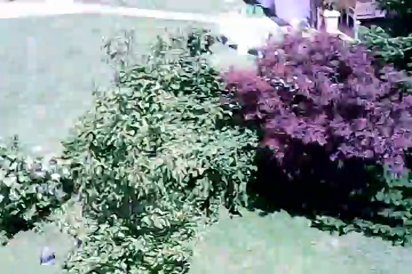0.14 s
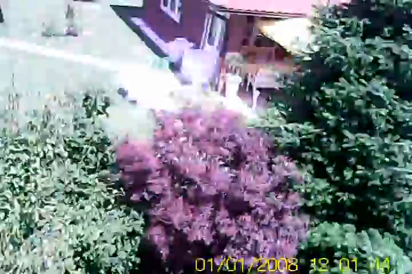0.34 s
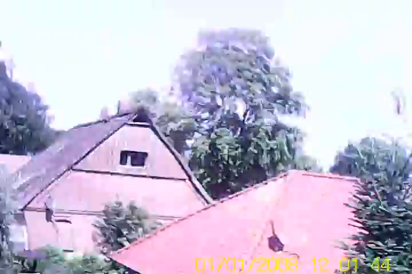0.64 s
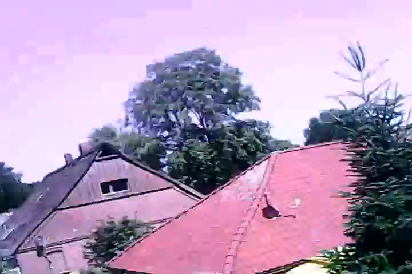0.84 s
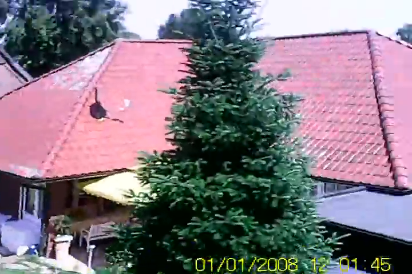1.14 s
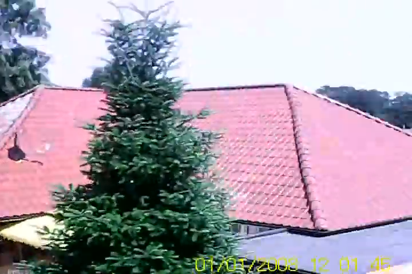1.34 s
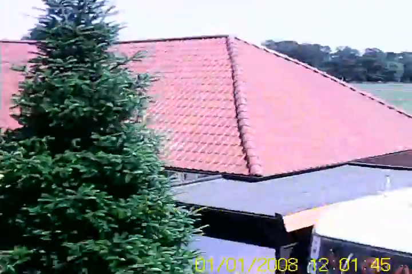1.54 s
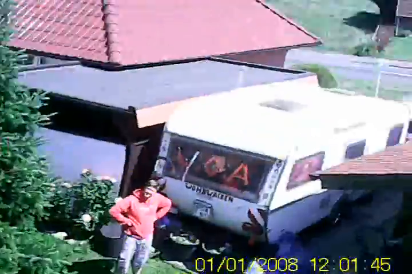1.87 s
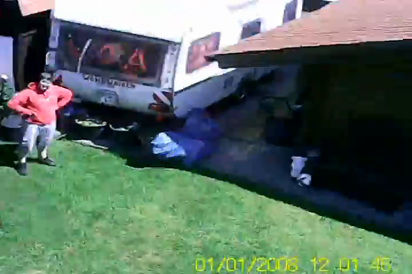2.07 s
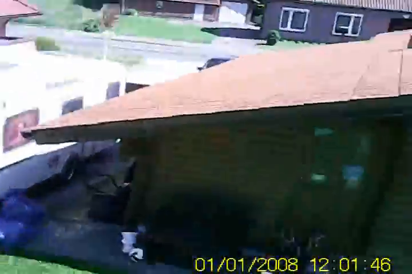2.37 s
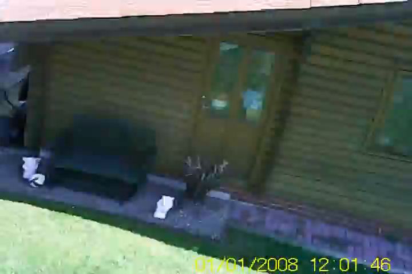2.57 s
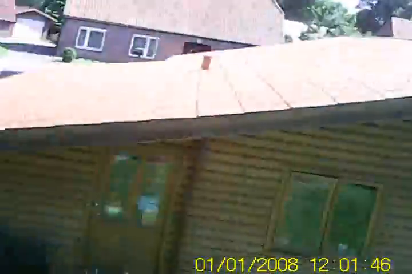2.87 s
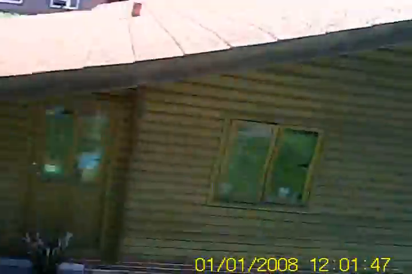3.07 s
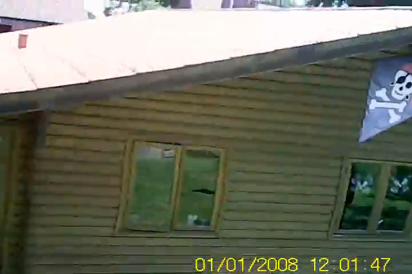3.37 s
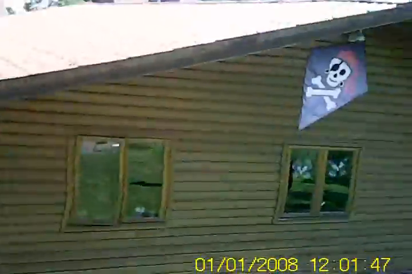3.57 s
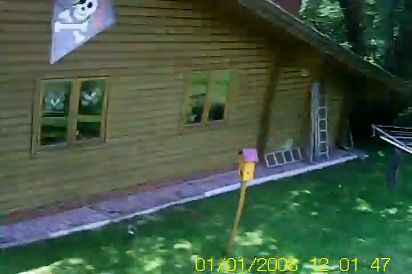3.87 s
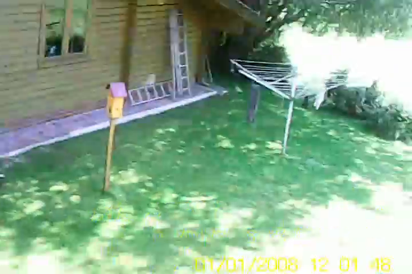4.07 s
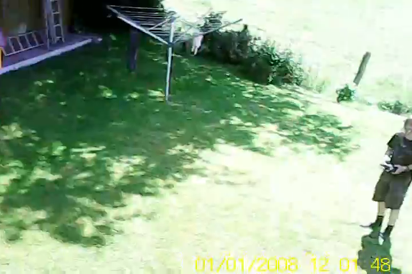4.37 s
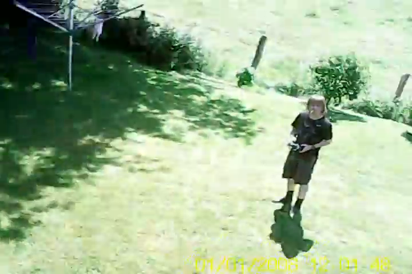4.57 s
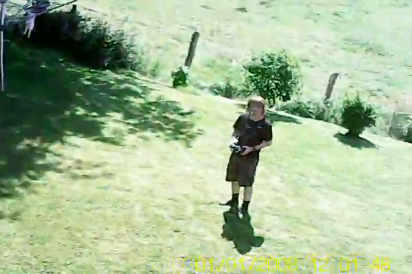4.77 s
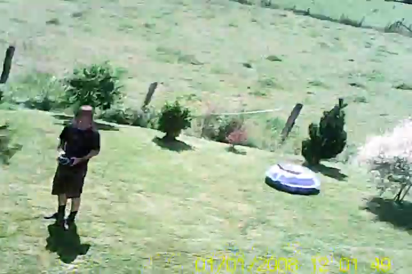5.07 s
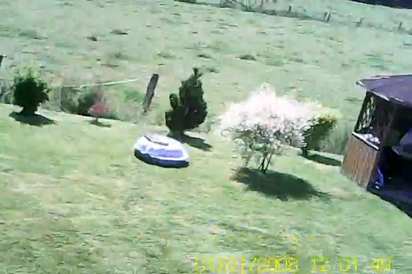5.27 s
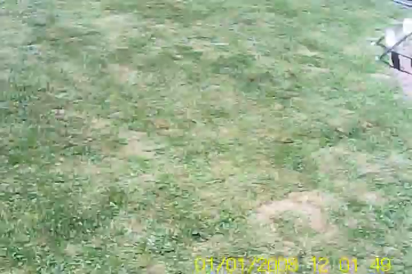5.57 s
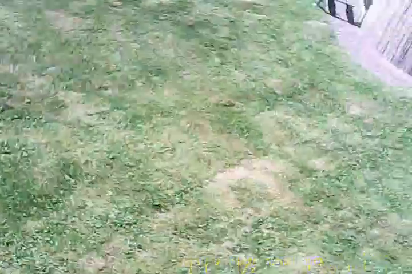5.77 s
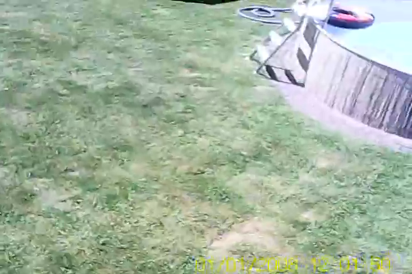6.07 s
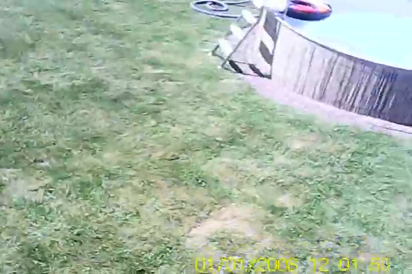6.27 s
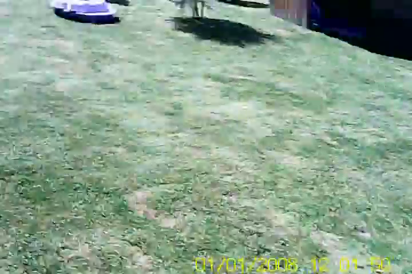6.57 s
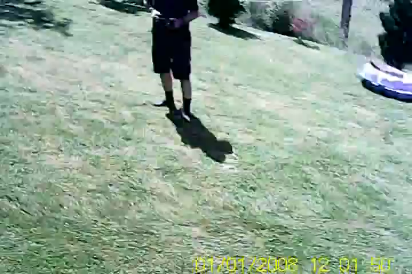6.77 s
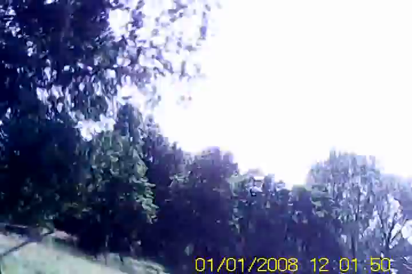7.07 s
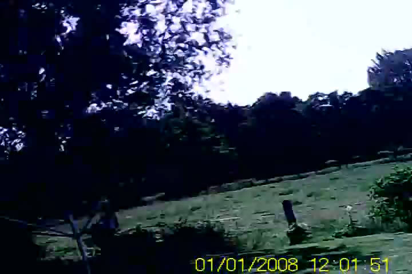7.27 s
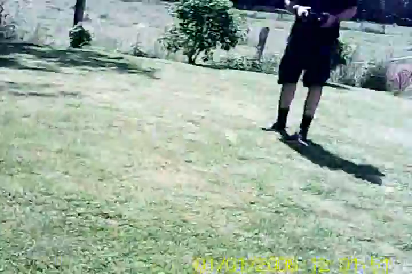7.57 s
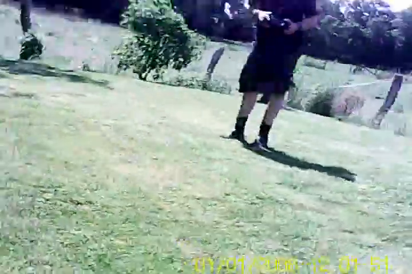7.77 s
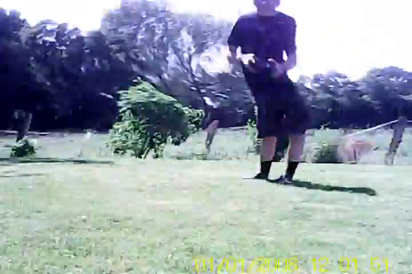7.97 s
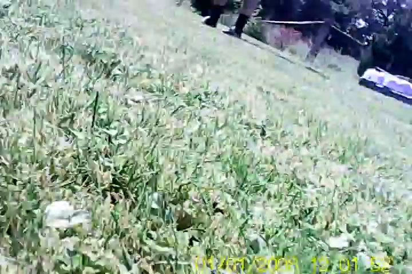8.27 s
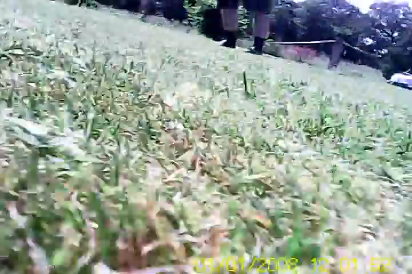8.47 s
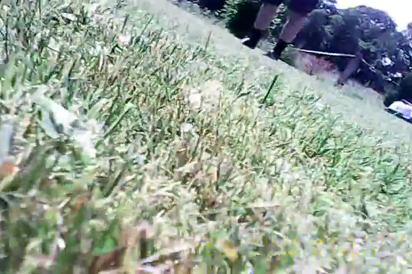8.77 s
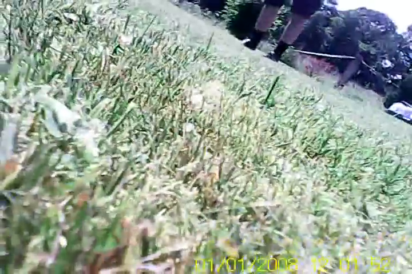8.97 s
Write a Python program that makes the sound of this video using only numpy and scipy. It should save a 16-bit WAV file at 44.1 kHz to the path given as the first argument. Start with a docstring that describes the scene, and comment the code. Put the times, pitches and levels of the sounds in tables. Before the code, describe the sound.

A small model helicopter flies outdoors, heard from a microphone on its own body. Its motors and plastic gears make a high, slightly wavering whine with a fine rattle, while the blades beat low and their downwash buffets the microphone. After about eight seconds the power cuts and it lands on grass with a soft thump. The whine dies quickly, and the coasting gears rattle and catch as they slow to a stop.

```python
"""A small coaxial model helicopter flies over a garden and lands on grass, heard from its own body.
Two motors drive two rotors through plastic gears that whine and rattle the frame. The blades beat
and slap, their downwash buffets the microphone, and the body sways. As the skids touch down the
power is cut: the coasting gears catch about once a turn and rattle to a stop."""
import sys
import numpy as np
from scipy import signal
from scipy.fft import rfft, irfft
from scipy.io import wavfile
from scipy.ndimage import uniform_filter1d

SR = 44100
rng = np.random.default_rng(int(sys.argv[2]) if len(sys.argv) > 2 else 0)


def to_wav(sig):
    """Store sig (one row per channel, or 1-D mono) as 16-bit WAV at the path in sys.argv[1].

    Samples outside -1..1 are clipped; the rate is SR.
    """
    pcm = np.clip(np.atleast_2d(sig), -1, 1) * 32767
    pcm = np.round(pcm).astype(np.int16)
    wavfile.write(sys.argv[1], SR, pcm.T)  # frames by channels


N = 403074
TIME = np.arange(N) / SR
TEETH = 69  # on each rotor's gear
SLAP_S, CUT_S, LANDING_S = 0.22, 7.91, 7.99  # hardest blade slap, throttle cut, touchdown

# upper gear's tooth rate under power, sagging at each steering move: time_s, pitch_hz
UPPER_TOOTH_RATE = [(0, 1878), (0.55, 1936), (0.9, 2003), (1.45, 2038), (2.1, 2082), (3.45, 2035),
                    (3.8, 1911), (3.95, 2000), (4.7, 2001), (5.03, 1869), (5.2, 1980), (5.6, 1972),
                    (5.85, 1925), (6.17, 1861), (6.35, 2057), (6.55, 2108), (7.1, 1986), (7.4, 2165),
                    (7.8, 2182), (7.91, 2097)]
# lower gear's tooth rate under power: time_s, pitch_hz
LOWER_TOOTH_RATE = [(0, 2005), (0.3, 2017), (0.75, 1962), (1.35, 2056), (3.77, 2074), (4.3, 2013),
                    (5.1, 1987), (5.4, 2030), (5.8, 1969), (6.15, 1944), (6.4, 2041), (6.75, 2081),
                    (7, 2022), (7.55, 2239), (7.78, 2265), (7.91, 2059)]
# envelope of both gears' whine on the tooth rate itself: time_s, gain_db
WHINE_ENVELOPE = [(0, -31.5), (0.7, -30), (1.0, -25.5), (3.5, -27.5), (4.5, -26), (5.0, -30.5),
                  (5.35, -27.5), (5.8, -31.5), (6.8, -25.5), (7.1, -28.5), (7.86, -25), (7.97, -33)]
# how well the frame radiates the gears' tones: frequency_hz, gain_db
FRAME_TONE_EQ = [(1600, -15.5), (1900, -4), (2060, -1.5), (2400, -9.5), (3300, 1.5), (3800, 2), (4100, -1),
                 (4500, -16), (5300, -8), (6170, 4), (6600, -2.5), (7500, -6), (8200, 3), (9500, -2)]
# spectrum of the frame shaken by the teeth: frequency_hz, gain_db
FRAME_RATTLE_EQ = [(500, -28), (950, -18.5), (1500, -25.5), (1850, -13.5), (2250, -8), (2620, -15),
                   (3150, -1), (3500, -0.5), (3850, 6.5), (4250, -6), (4700, -16), (5500, -14), (6900, -10),
                   (7500, -16.5), (9100, -11.5), (9900, -20)]
# envelope of the blades' beat and the body's sway: time_s, gain_db
BEAT_ENVELOPE = [(0, -24.5), (0.3, -18), (0.45, -26.5), (0.62, -22.5), (1.3, -20.5), (1.8, -27), (2, -16),
                 (2.35, -24), (2.7, -26), (3.05, -19), (3.48, -25.5), (3.66, -20.0), (5.2, -20.5),
                 (5.42, -26.5), (5.9, -28), (6.28, -38), (6.82, -16.5), (7.02, -28), (7.15, -18.5),
                 (7.91, -25)]


def upper_gear(turns):
    """A rough whine on twice the tooth rate that flares as it swings onto the frame's resonance."""
    # the gear's overtones: tooth_rate_multiple, gain_db
    partials = [(3, -5), (4, -8), (5, -9.5)]
    phase = mesh_phase(turns, runout=0.016, flutter=0.013, flutter_hz=199.2)
    force = tooth_force(turns, throb=1.14, blade_db=4.5, motor_db=2.5, chatter_db=4, chatter_hz=242)
    whine = amp(-16.5) * resonance() * steady(colour(force * np.cos(2 * phase), FRAME_TONE_EQ))
    force = tooth_force(turns, throb=1, blade_db=3, motor_db=1, chatter_db=3, chatter_hz=200)
    overtones = amp(-31) * colour(force * tones(phase, partials), FRAME_TONE_EQ)
    fundamental = amp(curve(WHINE_ENVELOPE) - 4) * np.cos(phase)  # beats against the lower gear
    return whine + overtones + fundamental


def lower_gear(turns, slack_db=1.44):
    """A cleaner whine on the tooth rate, with faint side tones; play blurs and weakens it."""
    # the motor's tones beside the mesh: tooth_rate_multiple, gain_db
    motor_partials = [(.625, -31.5), (0.861, -30.5), (1.375, -25), (1.625, -9)]
    phase = mesh_phase(turns, runout=0.0088, flutter=0.018, flutter_hz=99.1)
    force = tooth_force(turns, throb=0.49, blade_db=0.5, motor_db=0, chatter_db=1.7, chatter_hz=70)
    level = amp(curve(WHINE_ENVELOPE) - 2 - slack_db * tooth_play())
    whine = level * steady(colour(force * np.cos(phase), FRAME_TONE_EQ))
    overtones = tones(phase, [(2, -4.5), (3, -10), (4, -14)])
    motor = np.sqrt(2) * tones(phase, motor_partials)
    return whine + amp(-25) * force * (overtones + motor)


def tooth_rattle(turns, slack_db=0.83):
    """Teeth knock with random strength and shake the plastic frame, harder when they have play."""
    force = tooth_force(turns, throb=0.64, blade_db=1, motor_db=1.9, chatter_db=1.5, chatter_hz=300)
    knocks = force * (1 + 0.75 * np.cos(2 * np.pi * TEETH * turns)) * rng.standard_normal(N)
    return amp(-24 + slack_db * tooth_play()) * colour(knocks, FRAME_RATTLE_EQ)


def coasting_gears(turns, roughness=0.45):
    """Unloaded gears rattle loosely, groan down in pitch and buzz briefly wherever they catch."""
    # spectrum of the frame rattled by the coasting gears: frequency_hz, gain_db
    loose_eq = [(150, -37), (400, -16), (650, -19.5), (980, -10.5), (1450, -18), (2100, -5), (2560, -10.5),
                (3020, 1.5), (3330, -6.5), (3800, 3), (4250, -3), (5000, -31), (6150, -16), (9900, -23.5)]
    # the gears catching, about once a turn: centre_s, level_db, length_s
    catches = [(7.993, -15.5, 0.0052), (8.047, -19, 0.0043), (8.098, -20.5, 0.0085), (8.132, -18.5, 0.0091),
               (8.153, -25.5, 0.0064), (8.199, -20.5, 0.0092), (8.221, -35, 0.0047), (8.24, -29, 0.007),
               (8.269, -22, 0.011), (8.334, -23.5, 0.01), (8.367, -29.5, 0.008), (8.402, -33, 0.0084),
               (8.443, -26, 0.0088), (8.481, -32.5, 0.009), (8.569, -31, 0.026), (8.929, -44, 0.0056)]
    phase = mesh_phase(turns, runout=0.0047, flutter=0.008, flutter_hz=198.4)
    teeth = colour(sum(np.cos(k * phase) for k in range(2, 17)) + 0.37 * np.cos(phase), loose_eq)
    loose = colour(amp(3.5 * drift(250)) * rng.standard_normal(N), loose_eq)
    scrape = colour(rng.standard_normal(N), FRAME_RATTLE_EQ)
    groan = tones(phase, [(1, -29), (2, -32), (3, -27)])
    out = amp(-31) * (1 - powered()) * spin() ** 0.62 * (loose + 0.17 * teeth + groan)
    for centre_s, level_db, length_s in catches:
        near = slice(int((centre_s - 2 * length_s) * SR), int((centre_s + 2 * length_s) * SR))
        buzz = unit((1 - roughness) * unit(teeth[near]) + roughness * scrape[near])
        grip = 1 / (1 + (2 * (TIME[near] - centre_s) / length_s) ** 6)
        out[near] += amp(level_db) * grip * buzz
    return out


def mesh_phase(turns, runout, flutter, flutter_hz, drag=0.0079):
    """Phase of the teeth: uneven cut and backlash jitter it, and a tight spot slows it each turn."""
    jitter = runout * tooth_errors(turns) + flutter * tooth_play() * drift(flutter_hz)
    speed = 1 + jitter - drag * np.cos(2 * np.pi * turns)
    return 2 * np.pi * TEETH * np.cumsum(np.gradient(turns) * speed)


def tooth_errors(turns):
    """The uneven cut of a gear: a fine random pattern of rms 1 that returns every turn."""
    grid = np.linspace(0, 1, 257)
    shape = sum(np.cos(2 * np.pi * (k * grid + rng.random())) / np.sqrt(k) for k in range(3, 15))
    return unit(np.interp(turns % 1, grid, shape))


def tooth_force(turns, throb, blade_db, motor_db, chatter_db, chatter_hz, limit_db=9):
    """Load on the teeth swells with each rotor turn, blade and motor turn, until the shaft gives."""
    angle = 2 * np.pi * turns
    swing_db = throb * (1.28 + 3 * resonance()) * np.cos(angle)  # deeper while the frame rings
    swing_db += blade_db * np.cos(2 * np.pi * blade_passes())
    swing_db += motor_db * np.cos(8 * angle)  # eight motor turns to one of the rotor
    swing_db += chatter_db * drift(chatter_hz)
    return steady(amp(limit_db * np.tanh(swing_db / limit_db)))


def tooth_play():
    """Looseness of the teeth: their backlash, and more while the frame rings."""
    # backlash, growing as the rotors tilt for the descent: time_s, looseness_factor
    backlash = [(0, 0.89), (4.8, 0.82), (5.9, 0.94), (6.3, 1.69), (7.15, 1.7), (7.5, 2.72), (7.95, 1.86)]
    return curve(backlash) + 0.5 * resonance()


def resonance(ring_hz=3809, width_hz=420):
    """How closely twice the upper gear's tooth rate sits on the frame's ring, 0 to 1."""
    detune_hz = 2 * curve(UPPER_TOOTH_RATE) * spin() - ring_hz
    return 1 / (1 + (2 * detune_hz / width_hz) ** 2)


def powered():
    """Fader for the whine, which dies quickly once the throttle is cut."""
    return curve([(CUT_S, 1), (CUT_S + 0.12, 0)])


def spin(run_down_s=0.43):
    """Share of their speed that the rotors keep: 1 under power, then dying away."""
    return np.exp(-np.maximum(TIME - CUT_S, 0) / run_down_s)


def rotor_turns(tooth_rate):
    """Turns that a rotor has made, from its gear's tooth rate."""
    return np.cumsum(curve(tooth_rate) * spin()) / SR / TEETH


def blades(turns, dip_width=0.17, slap_width=0.026):
    """Each passing blade sucks a dip of pressure; in its own wake it slaps, pushing first."""
    place = (blade_passes() + 0.018 * drift(27) + 0.5) % 1 - 0.5  # in blade spacings, 0 at the pass
    angle = 2 * np.pi * place
    dip = -np.exp(-abs(place + 0.029 * drift(60)) / dip_width)
    overtones = amp(-10 + 4.3 * drift(6.7)) * np.cos(2 * angle) + amp(-20) * np.cos(3 * angle)
    hum = np.cos(angle) + overtones
    beat = 0.58 * unit(dip - dip.mean()) - 1.2 * hum + 0.33 * np.cos(2 * np.pi * turns)
    slap = -2 * (place / slap_width) / (1 + (place / slap_width) ** 2) * np.cos(angle / 2) ** 2
    lift = curve([(8.03, 1), (8.25, 0)])  # the beat fades after landing
    beat_level = lift * amp(curve(BEAT_ENVELOPE) - 5.5 + 0.93 * drift(11))
    return beat_level * beat + wake() * amp(drift(40)) * slap


def blade_passes():
    """Blades of the lower rotor that have passed the microphone, counted from the hardest slap."""
    turns = rotor_turns(LOWER_TOOTH_RATE)
    return 2 * (turns - np.interp(SLAP_S, TIME, turns))


def wake(half_width_s=0.053):
    """Strength of the slap: it swells and dies as the rotor cuts once through its own wake."""
    return amp(-12) / (1 + ((TIME - SLAP_S) / half_width_s) ** 2)


def downwash(lag=0.07, breeze_db=-66.5):
    """Lumpy turbulence puffs onto the microphone behind each blade, then sinks to a light breeze."""
    # spectrum of the air on the microphone: frequency_hz, gain_db
    wash_eq = [(10, 10.5), (28, 5.5), (45, -8.5), (90, 7), (160, 4), (300, -1.5), (500, -8.5), (800, -17),
               (1500, -19.5), (4000, -53)]
    # envelope of the buffeting under power: time_s, gain_db
    buffet = [(0, -29.5), (0.3, -29), (0.55, -37), (1.6, -33.5), (2.4, -35), (3.3, -33), (4.6, -39.5),
              (5.7, -34.5), (6.4, -35), (6.75, -30), (7.25, -38), (7.42, -26.5), (7.91, -32)]
    puffs = unit(amp(2.9 * np.cos(2 * np.pi * (blade_passes() - lag)) + 1.5 * drift(12)))
    calm = 1 / (1 + 3 * wake())  # while the blades slap, the air arrives in clean pulses
    level = calm * amp(curve(buffet) + 2) * spin() ** 3.2 + amp(breeze_db)
    return level * colour(puffs * rng.standard_normal(N), wash_eq)


def touchdown(attack_s=0.0037, push_decay_s=0.082, sway_hz=46, sway_decay_s=0.078):
    """The skids meet the grass: a soft push, and the body sways on them."""
    age = np.maximum(TIME - LANDING_S, 0)
    envelope = (1 - np.exp(-age / attack_s)) * np.exp(-age / push_decay_s)
    push = envelope * (1 - age / (2 * push_decay_s))
    sway = np.sin(2 * np.pi * sway_hz * age) * np.exp(-age / sway_decay_s)
    return amp(-13) * push + amp(-19) * sway


def body_sway():
    """Slow pressure swings as the body rocks, settling as the rotors stop."""
    # rumble of the body rocking in the air and on its skids: frequency_hz, gain_db
    rumble_eq = [(3, -1.5), (12, -2.5), (30, -5.5), (60, -17), (150, -35.5), (600, -73)]
    return amp(curve(BEAT_ENVELOPE) - 12) * spin() ** 0.52 * colour(rng.standard_normal(N), rumble_eq)


def amp(db):
    """Decibels to linear gain."""
    return 10 ** (np.asarray(db) / 20)


def unit(x):
    """Scales x to rms 1."""
    return x / np.sqrt(np.mean(x ** 2) + 1e-20)


def steady(x):
    """Holds the slow level of x at rms 1, leaving its throb."""
    return x / np.sqrt(abs(uniform_filter1d(x ** 2, 4400)) + 1e-12)


def curve(points):
    """Joins (time_s, value) points with straight lines."""
    return np.interp(TIME, *np.transpose(points))


def tones(phase, partials):
    """Stacks (multiple, gain_db) partials on one phase."""
    return sum(amp(db) * np.cos(multiple * phase) for multiple, db in partials)


def colour(x, eq):
    """Filters x through (frequency_hz, gain_db) points, to rms 1."""
    hz, db = np.transpose(eq)
    bins = np.fft.rfftfreq(N, 1 / SR)
    gain = amp(np.interp(np.log(bins + 1), np.log(hz), db))
    return unit(irfft(rfft(x) * gain, N))


def drift(hz):
    """Smooth random wander of rms 1, rolling off above hz."""
    bins = np.fft.rfftfreq(N, 1 / SR)
    return unit(irfft(rfft(rng.standard_normal(N)) / (1 + (bins / hz) ** 2), N))


def scene():
    """Gears, blades and moving air, all at the one microphone on the body."""
    upper, lower = rotor_turns(UPPER_TOOTH_RATE), rotor_turns(LOWER_TOOTH_RATE)
    airborne = curve([(LANDING_S, 1), (LANDING_S + 0.065, 0)])  # teeth knock until the skids settle
    whine = powered() * (upper_gear(upper) + lower_gear(lower))
    rattle = airborne * spin() * tooth_rattle(upper) + coasting_gears(upper)
    return (whine + rattle + blades(lower) + downwash() + touchdown() + body_sway())[None]


def record(dry):
    """Softly limits the loudest peaks and cuts the top of the treble."""
    cutoff_hz = 10020
    low_pass = signal.firwin(601, cutoff_hz, window=("kaiser", 9), fs=SR)
    return signal.oaconvolve(np.tanh(dry), low_pass[None], "same")


dry = scene()
out = record(dry)
to_wav(out)
```